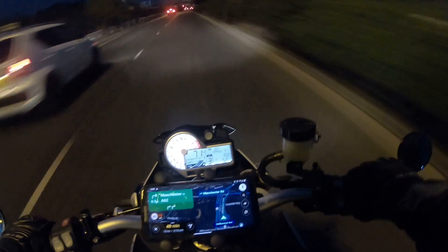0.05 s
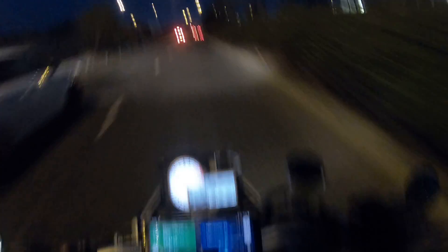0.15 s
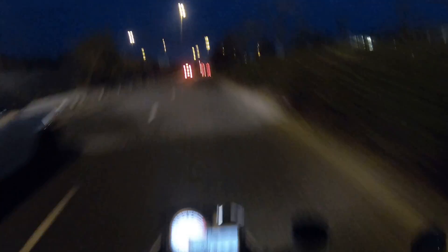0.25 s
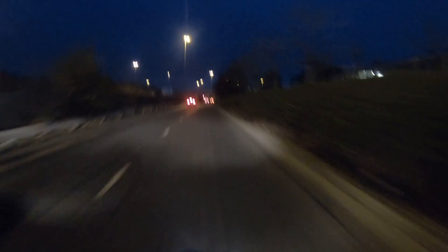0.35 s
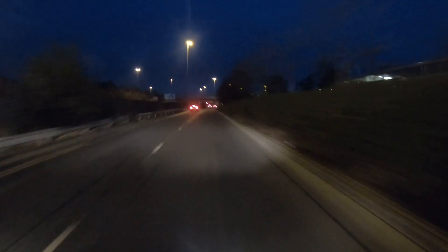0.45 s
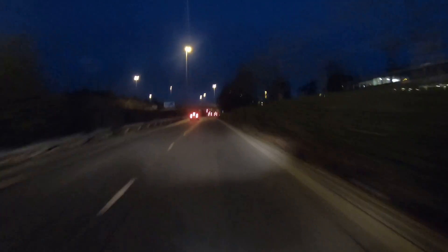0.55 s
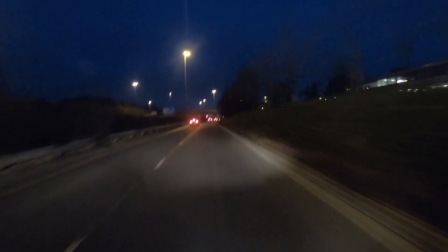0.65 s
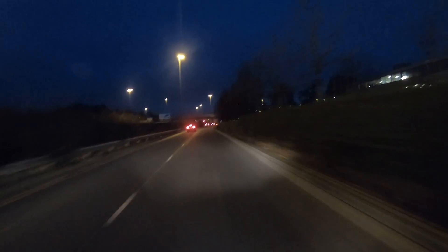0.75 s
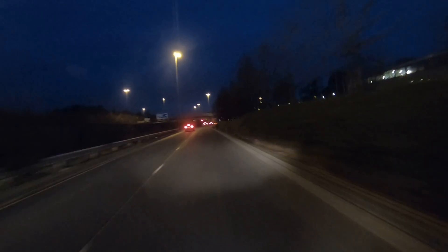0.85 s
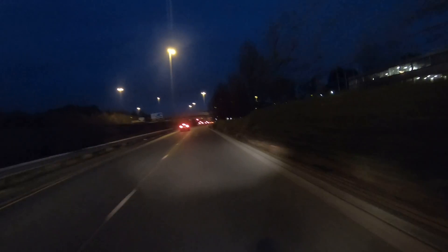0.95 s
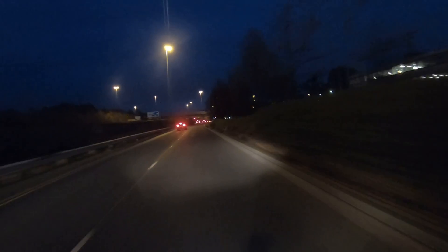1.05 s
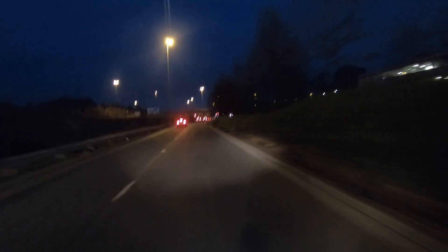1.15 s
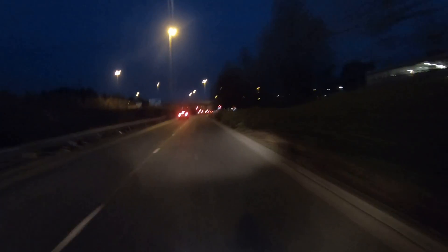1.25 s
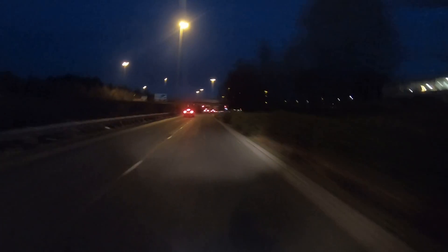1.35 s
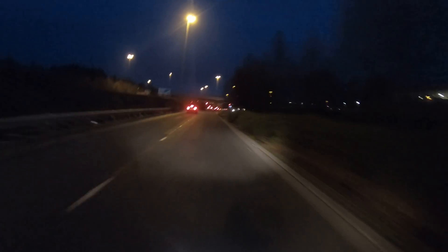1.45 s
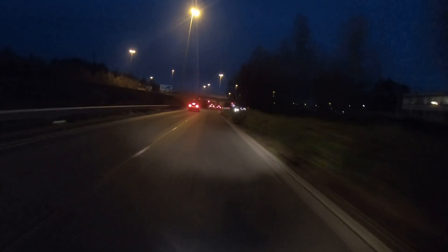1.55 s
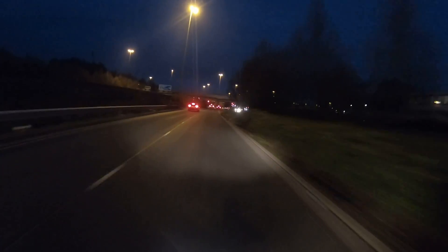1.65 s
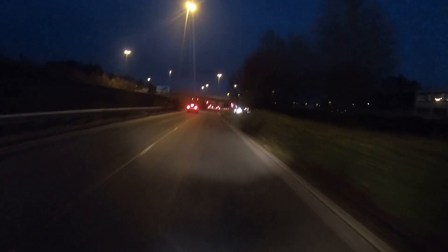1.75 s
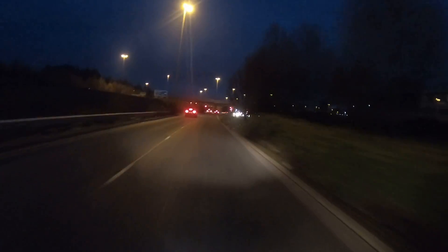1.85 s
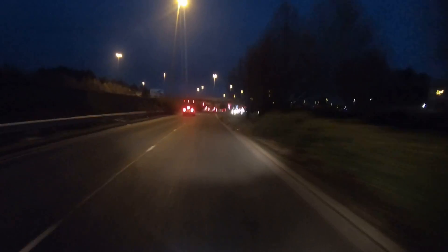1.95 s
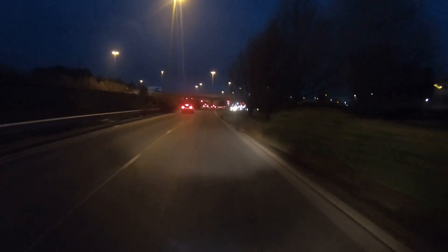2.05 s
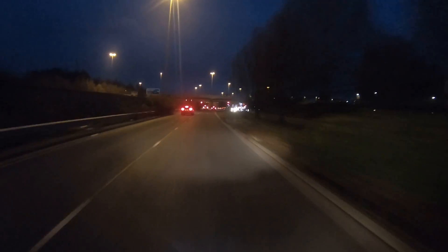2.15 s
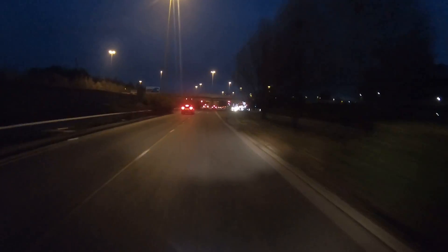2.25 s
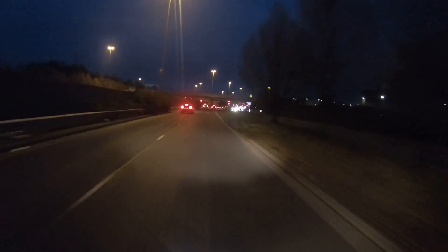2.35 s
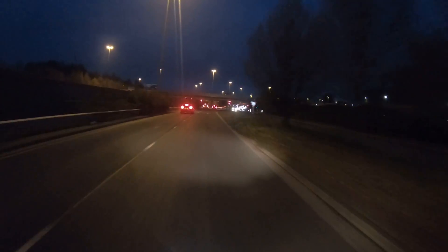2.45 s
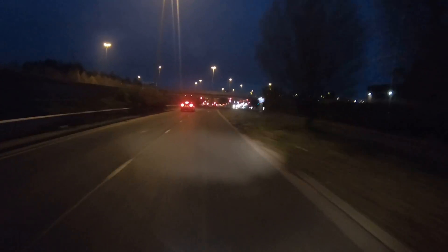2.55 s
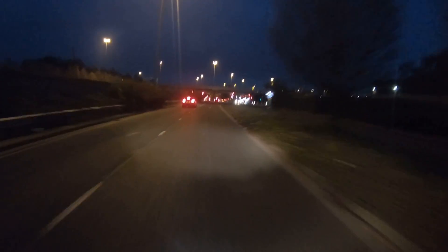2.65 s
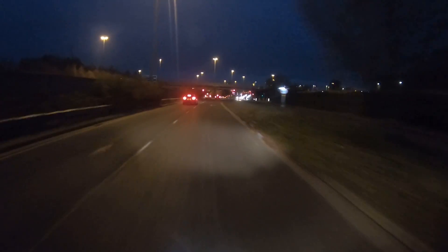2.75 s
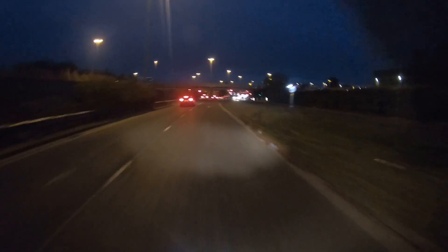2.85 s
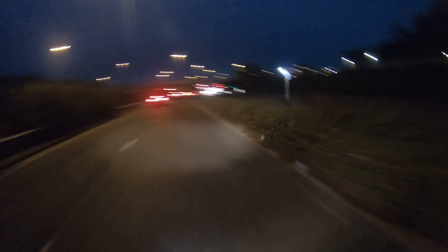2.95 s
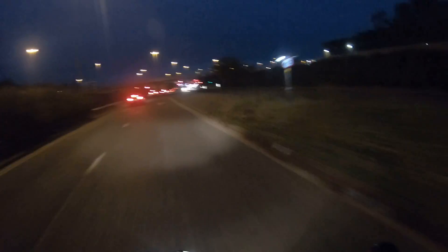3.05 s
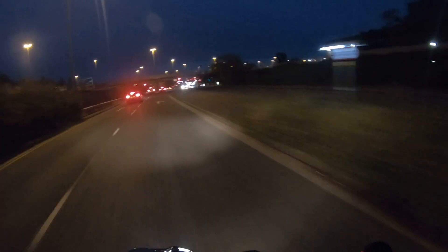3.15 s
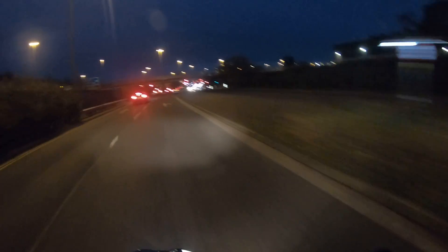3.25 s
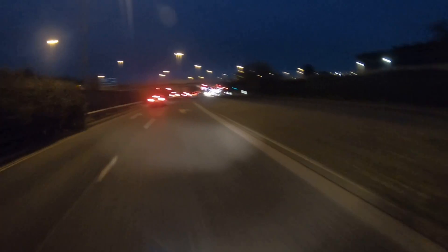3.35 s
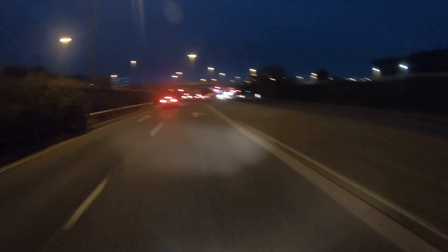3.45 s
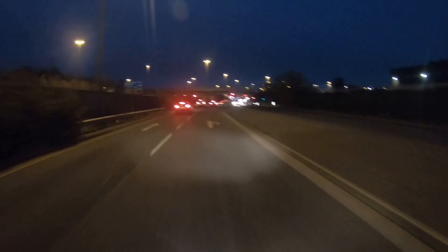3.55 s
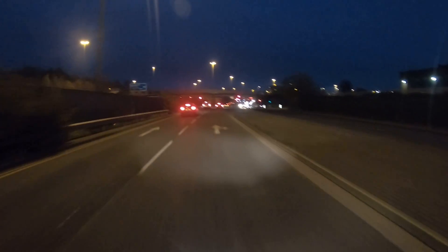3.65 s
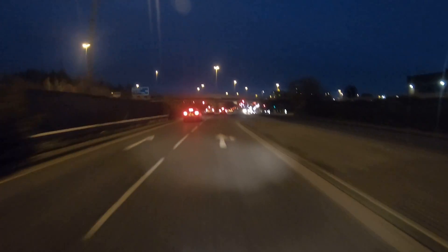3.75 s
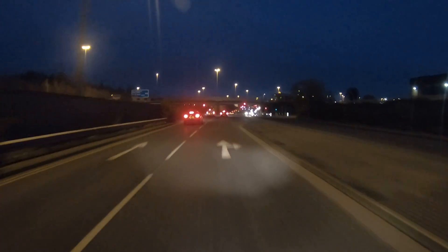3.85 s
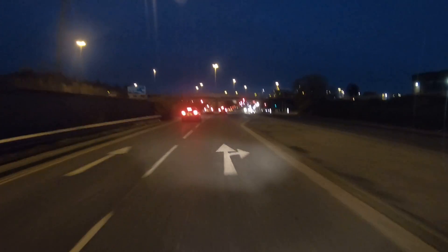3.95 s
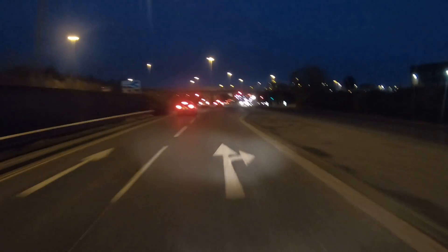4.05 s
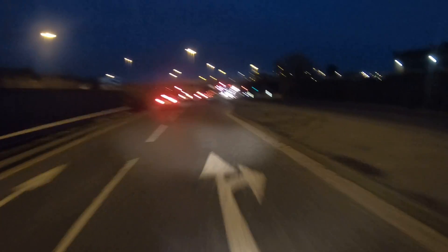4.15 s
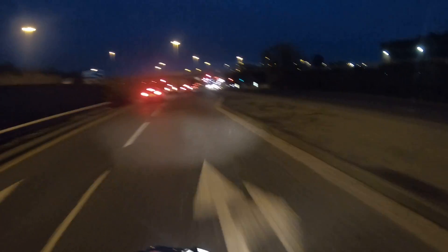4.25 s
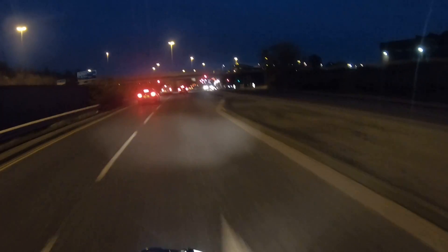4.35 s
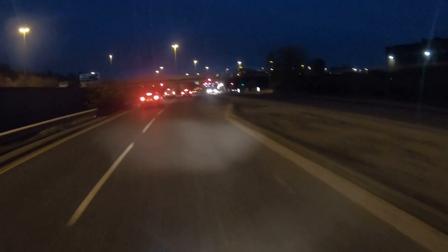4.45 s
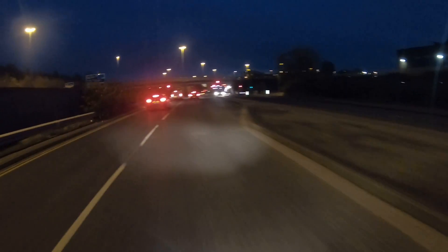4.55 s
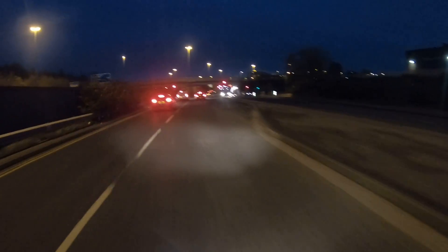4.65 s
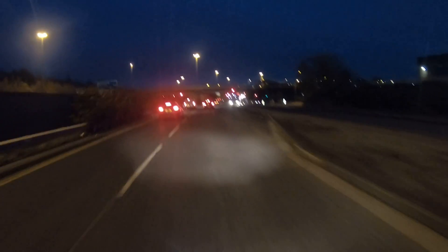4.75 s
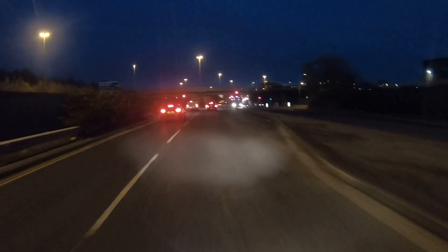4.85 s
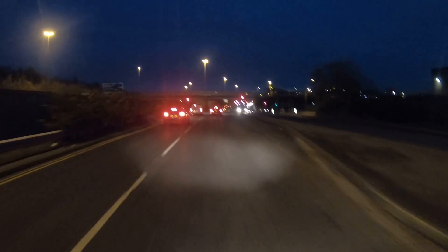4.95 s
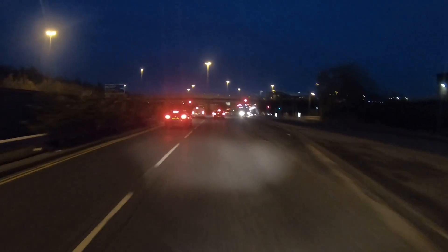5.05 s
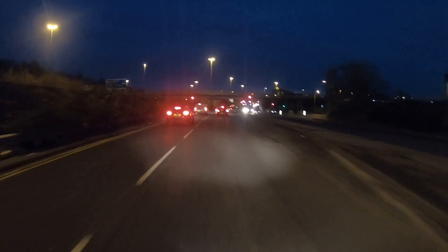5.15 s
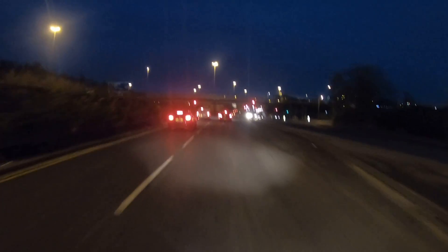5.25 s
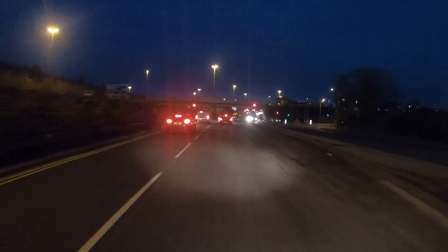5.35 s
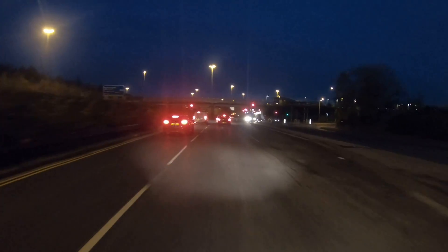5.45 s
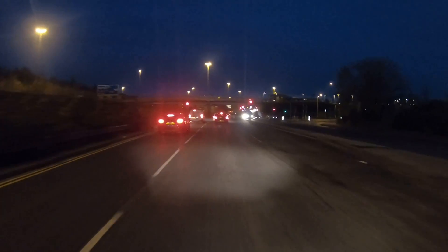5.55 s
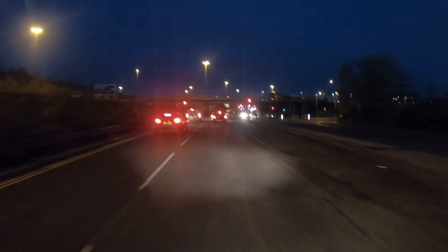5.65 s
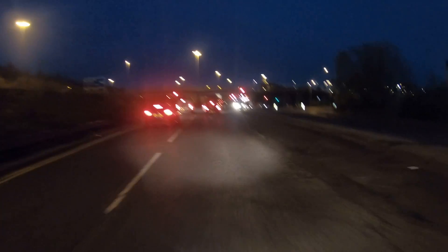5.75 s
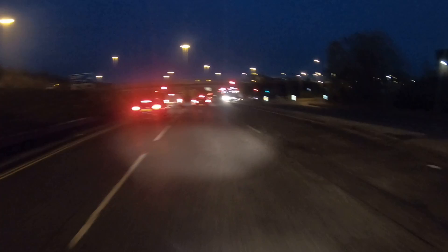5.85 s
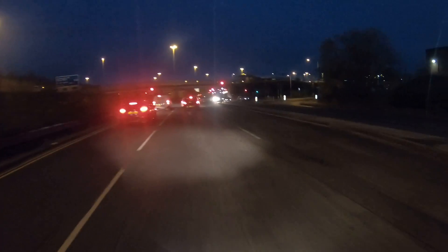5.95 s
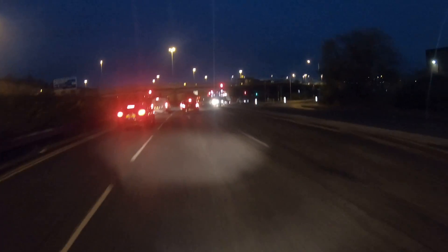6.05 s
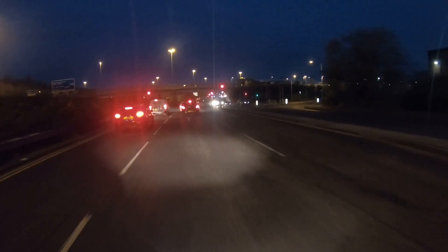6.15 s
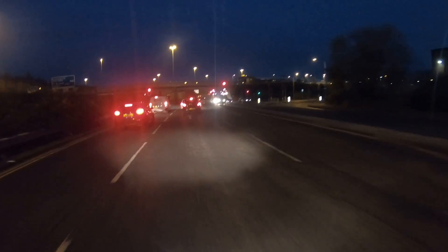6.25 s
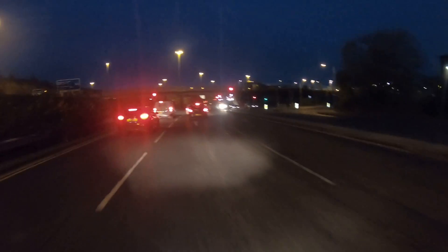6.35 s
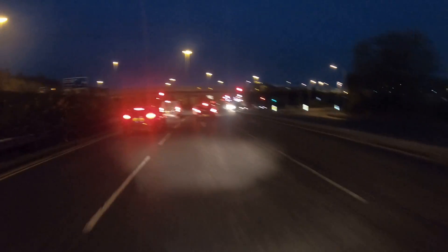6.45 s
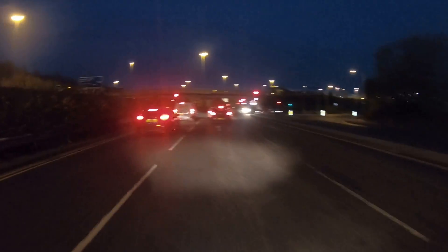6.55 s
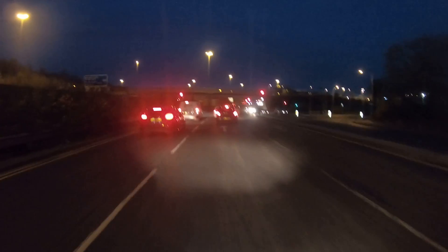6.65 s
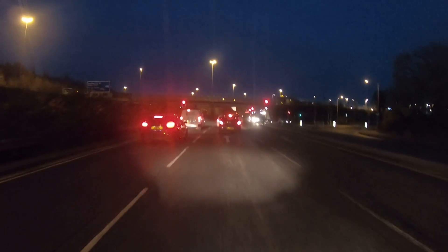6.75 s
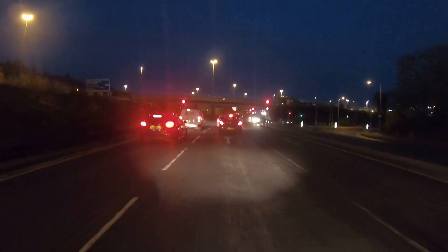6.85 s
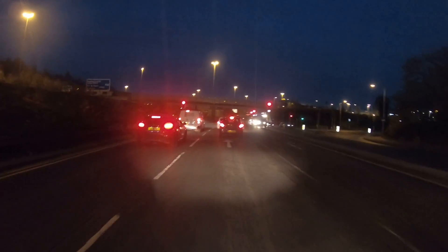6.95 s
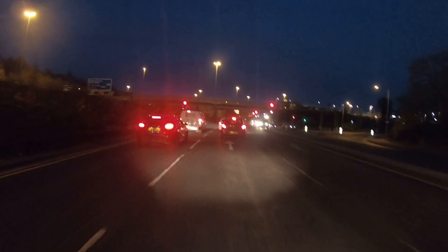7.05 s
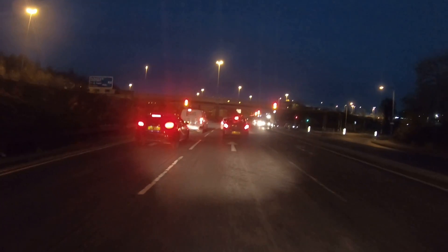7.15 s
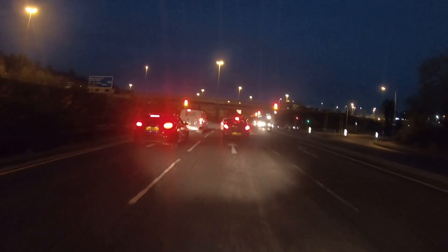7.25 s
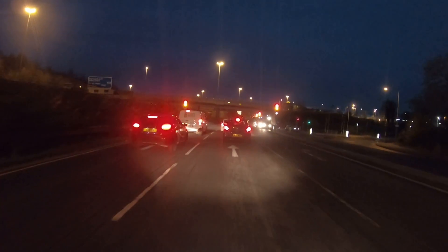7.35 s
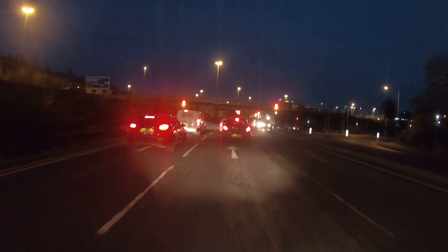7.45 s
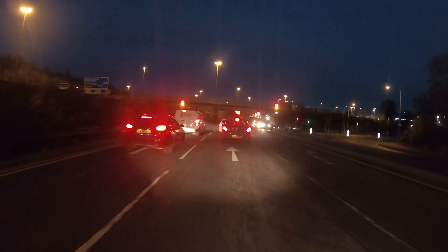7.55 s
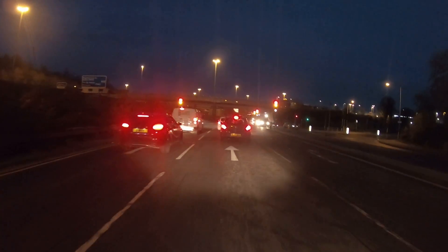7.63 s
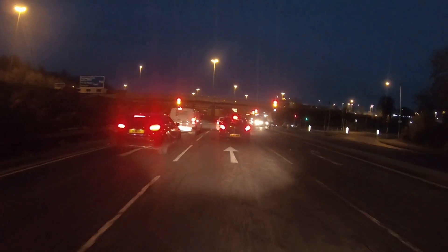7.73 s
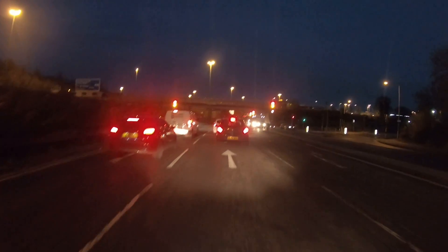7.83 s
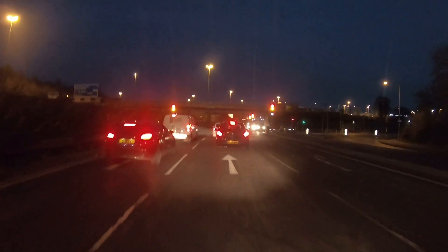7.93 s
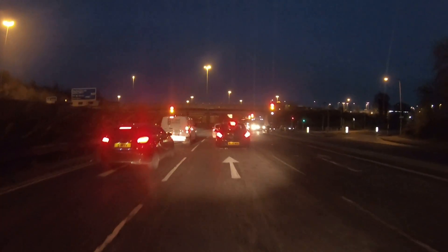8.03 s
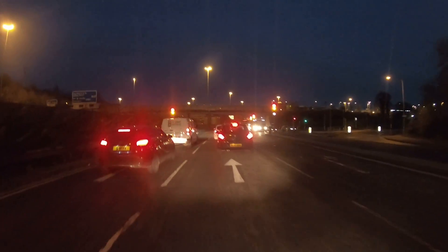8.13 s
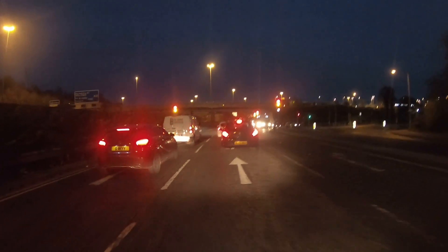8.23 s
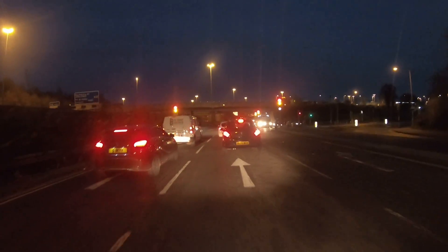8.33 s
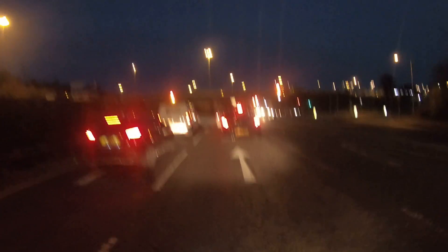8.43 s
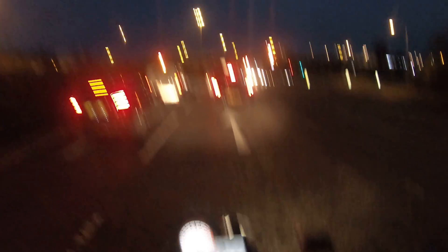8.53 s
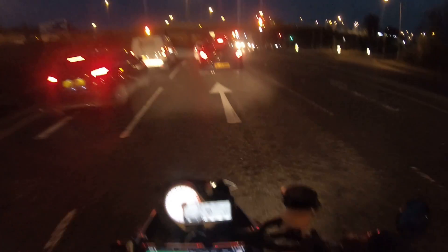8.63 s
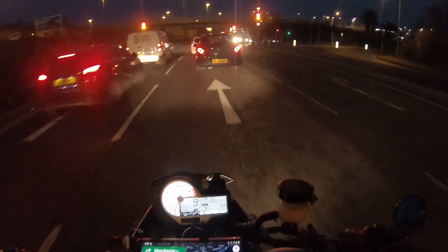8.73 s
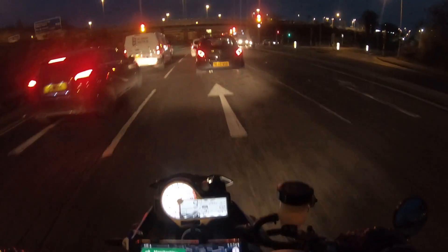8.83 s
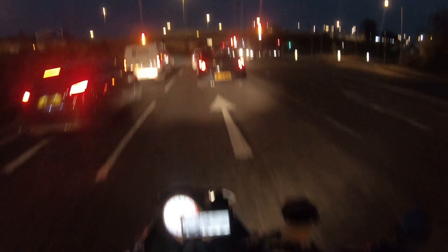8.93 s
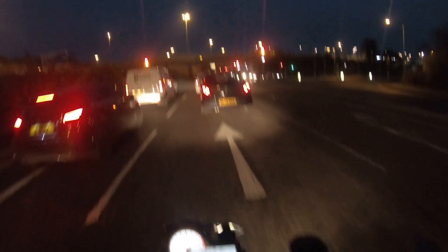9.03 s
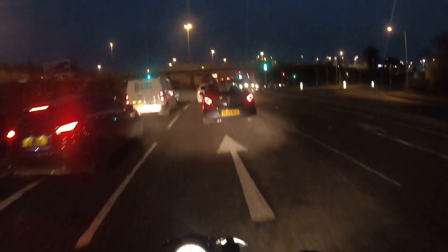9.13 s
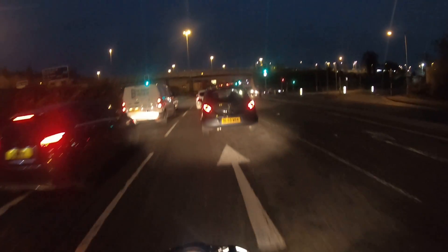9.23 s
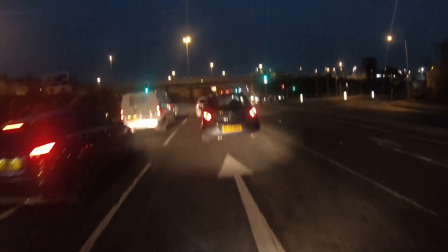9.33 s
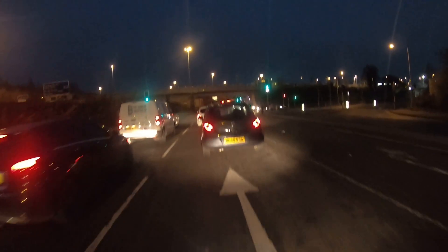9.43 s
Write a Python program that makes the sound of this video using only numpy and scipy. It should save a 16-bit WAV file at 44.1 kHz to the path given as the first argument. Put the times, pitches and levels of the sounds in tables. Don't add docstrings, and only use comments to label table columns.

```python
import sys
import numpy as np
from scipy import signal
from scipy.fft import rfft, irfft, next_fast_len
from scipy.io import wavfile
from scipy.ndimage import uniform_filter1d, map_coordinates

SR = 44100
rng = np.random.default_rng(int(sys.argv[2]) if len(sys.argv) > 2 else 0)


def amplitude_ratio(level_db):
    exponent = np.asarray(level_db, float) / 20
    return 10 ** exponent


def pcm_store(signal):
    levels = np.round(np.clip(np.atleast_2d(signal), -1, 1) * 32767)
    wavfile.write(sys.argv[1], SR, levels.astype(np.int16).T)


N = 418503
T_S = np.arange(N) / SR
CLUTCH_S = 6.23


def unit(x):
    return x / np.sqrt(np.mean(x ** 2) + 1e-20)


def curves(rows):
    s, *cols = np.transpose(rows)
    return [np.interp(T_S, s, c) for c in cols]


def wobble(rate_hz):
    knots = rng.standard_normal(int(N * rate_hz / SR) + 4)
    return map_coordinates(knots, [np.arange(N) * rate_hz / SR])


def filtered(x, response):
    m = next_fast_len(N + SR // 2)
    return irfft(rfft(x, m) * response(np.fft.rfftfreq(m, 1 / SR)), m)[:N]


def coloured(x, spectrum):
    f, db = np.transpose(spectrum)
    log_f = np.log(f + 1)
    return unit(filtered(x, lambda hz: amplitude_ratio(np.interp(np.log(hz + 1), log_f, db, -120, -120))))


def resonant(x, modes):
    def response(f):
        return sum(amplitude_ratio(db) * c * w / (c * c - f * f + 1j * f * w) for c, w, db in modes)
    return unit(filtered(x, response))


def patchy(depth_db):
    z = signal.stft(rng.standard_normal(N), nperseg=512)[2]
    field = uniform_filter1d(uniform_filter1d(rng.standard_normal(z.shape), 4, 0), 10, 1)
    return signal.istft(z * amplitude_ratio(depth_db * unit(field)), nperseg=512)[1][:N]


def swells(rows, rise_db_s, fall_db_s):
    gain = 0
    for start, end, db in rows:
        early_s = np.clip(start - T_S, 0, None)
        late_s = np.clip(T_S - end, 0, None)
        gain = gain + amplitude_ratio(db - rise_db_s * early_s - fall_db_s * late_s)
    return gain


def strikes(turns):
    return np.flatnonzero(np.diff(np.floor(turns)) > 0)


# (time [s], firing rate [1/s], drone level [dB])
OVERRUN = [(0.0, 228.6, -12), (2.1, 188.6, -11), (2.94, 164.5, -12.5), (3.5, 149.2, -12),
           (4.62, 112.8, -12), (5.18, 97.3, -14), (5.74, 79.6, -18.7), (6.24, 60.6, -28)]
# (time [s], firing rate [1/s])
IDLE = [(6.3, 46.2), (7.09, 41.3), (7.5, 43.5), (8.03, 42.9), (8.16, 46.7), (8.47, 41.3), (8.6, 45.7),
        (8.97, 42.4), (9.2, 43.4), (9.4, 38.3)]
# (time [s], loss [dB])
MISFIRES = [(5.639, -8.5), (5.791, -19), (5.866, -13.5), (5.962, -8.5), (6.038, -12.5), (6.145, -7),
            (6.24, -11.5), (6.432, -9.5), (6.601, -1.5), (6.798, -7.5), (6.68, -5.5), (6.98, -6.5),
            (7.053, -13.5), (7.179, -9.5), (7.632, -7), (7.706, -18.5), (7.92, -5), (8.467, -7.5),
            (8.602, -1.5), (8.645, -24), (8.781, -1.5), (8.823, -5), (9.2, -1.5), (9.35, -6.5), (9.446, -2)]
# (time [s], part of a firing cycle reached [1])
IDLE_SYNC = (7.5, .73)


def firings():
    turns_per_db, stall_s, recover_s = .0025, .012, .09
    count = np.cumsum(curves([row[:2] for row in OVERRUN] + list(IDLE))[0]) / SR
    lag = 0
    for s, db in MISFIRES:
        after_s = np.clip(T_S - s, 0, None)
        lag = lag + turns_per_db * db * (1 - np.exp(-after_s / stall_s)) * np.exp(-after_s / recover_s)
    return count - count[int(IDLE_SYNC[0] * SR)] % 1 + IDLE_SYNC[1] + lag


def stumble():
    return sum(db * np.exp(-((T_S - s) / 0.0095) ** 2) for s, db in MISFIRES)


# (time [s], length [s], loss [dB])
TURNS = [
    (.33, 0.13, -1),
    (1.765, .15, -4),
    (2.465, 0.1, -2.5),
]
# (frequency [Hz], width [Hz], level [dB])
TAIL_PIPE = [(425.8, 11, -37), (362, 39.4, -25), (309.8, 22, -30), (198, 11, -38.5), (167, 28, -27),
             (142, 26, -27)]
OFF_PEAK_DB = [-52, -44.5, -53.5]


def drone(count):
    hz, first_db = curves(OVERRUN)
    since_s = T_S - CLUTCH_S
    turn_db = sum(db * np.exp(-((T_S - s) / length) ** 2) for s, length, db in TURNS)
    lift = np.sqrt(sum(amplitude_ratio(db) ** 2 / (1 + (2 * (2 * hz - c) / w) ** 2) ** 2 for c, w, db in TAIL_PIPE))
    sink_db = .05 * (hz - 100.5)
    upper = [amplitude_ratio(db - sink_db + 4 * wobble(7)) for db in OFF_PEAK_DB]
    gains = [amplitude_ratio(first_db + turn_db), upper[0] + lift * amplitude_ratio(0.4 * wobble(8.7))] + upper[1:]
    fade_db = np.interp(since_s, [-.5, -.1, 0, .02, .07, .14], [0, 2, 2, -10, -12, -40]) + stumble()
    overtone_db = np.interp(since_s, [-.6, -.4], [.8, 0])
    sway = 0.021 * wobble(30)
    total = 0
    for k, g in enumerate(gains, start=1):
        level = amplitude_ratio((k > 1) * overtone_db + fade_db + 0.26 * wobble(25))
        total = total + np.sqrt(2) * g * level * np.cos(2 * np.pi * k * (count + sway))
    return total


# (time [s], combustion level [dB])
BURN = [(5.2, -31), (5.6, -29), (6.2, -32), (6.31, -33.5), (6.75, -32), (6.95, -24.5), (7.5, -21.5),
        (9.49, -22.5)]
# (frequency [Hz], width [Hz], level [dB])
PIPE = [(130.6, 48.8, 6.5), (268, 16, -3), (317.7, 37, -2.5), (404, 57, -8.5)]
# (frequency [Hz], density [dB per Hz])
INTAKE = [(450, -30.5), (600, -1.5), (850, 5.5), (1000, 1), (1070, 8.5), (1140, -8.5), (1400, -15.5),
          (2000, -34.5)]


def combustion(count):
    at = strikes(count + .43 + .02 * wobble(40))
    settled = np.interp(T_S - CLUTCH_S, [0, .6], [0, 1])
    uneven_db = (3 - 1.9 * settled[at]) * rng.standard_normal(len(at))
    pairing_db = 1.5 * wobble(3)[at] * (-1) ** np.arange(len(at))
    loss_db = np.roll(stumble(), -int(.009 * SR))[at]
    kicks = np.zeros(N)
    kicks[at] = amplitude_ratio(uneven_db + pairing_db + loss_db)
    soft = signal.fftconvolve(kicks, np.hanning(int(0.0025 * SR)), "same")
    blowing = signal.lfilter([1], [1, -np.exp(-1 / (0.028 * SR))], soft)
    puffs = resonant(blowing * rng.standard_normal(N), PIPE[1:])
    upper = resonant(soft, PIPE[1:]) + amplitude_ratio(-7) * puffs
    chambers = resonant(resonant(soft, PIPE[:1]), PIPE[:1])
    boom = chambers + amplitude_ratio(-14) * resonant(soft, [(43.2, 52, 0)])
    gulp = coloured((blowing + .12) * rng.standard_normal(N), INTAKE)
    bark = np.roll(upper, int(.004 * SR))
    pulses = amplitude_ratio(-14 * (1 - settled)) * (amplitude_ratio(-12.5) * bark + amplitude_ratio(-22) * gulp) - boom
    running = np.sqrt(np.abs(uniform_filter1d(pulses ** 2, SR // 2)) + 1e-12)
    burn_db = curves([(5.05, -63.5)] + list(BURN))[0]
    return amplitude_ratio(burn_db + 3.5) * pulses / running


# (time [s], length [s], multiple of firing rate [1], level against clatter [dB])
WHIRRS = [
    (.1, 0.16, 6.25, -1.5),
    (.6, 0.22, 5, -7),
    (2.698, .33, 9, -5),
    (4.17, 0.068, 39, -19),
    (4.614, .08, 39, -17.5),
    (6.1, 0.11, 39.5, -10),
]


def whirrs(count):
    total = 0
    for s, length, k, db in WHIRRS:
        swell = amplitude_ratio(db + 4.1 * wobble(60)) * np.exp(-((T_S - s) / length) ** 4)
        total = total + swell * np.sin(2 * np.pi * k * count + 0.76 * wobble(45))
    return total


# (time [s], clatter level [dB])
MACHINE = [(0, -33), (.6, -34.5), (1.3, -32), (2.9, -32.5), (4.0, -37.5), (5.0, -40), (6.3, -41),
           (6.8, -38.5), (7.3, -37), (8.0, -38.5), (9.49, -39)]
# (multiple of firing rate [1], level [dB])
GEARS = [(8.5, -4), (9.25, -7), (13, -9), (25, 1.5), (26, 5), (39, -1.5)]
# (frequency [Hz], width [Hz], level [dB])
COVERS = [(1090, 65, 3.5), (1388, 89, 10.5), (1660, 59, -13), (1820, 160, -3), (2030, 32, -3),
          (2136, 12, 3), (2472, 32, -5), (2810, 39, -22), (3360, 48, -19.5), (3680, 61, -25.5),
          (4380, 65, -28.5), (4900, 52, -32), (6010, 180, -27.5)]
# (frequency [Hz], density [dB per Hz])
CASING = [(380, -41), (480, 4.5), (560, 0), (720, -2), (900, -3), (1200, 0.5), (1500, -5), (2100, -6),
          (2650, -13), (2800, -23.5), (3300, -39)]
# (frequency [Hz], density [dB per Hz])
HISS = [(2400, -13.5), (2800, -16.5), (3300, -7), (3800, -1.5), (4700, -7.5), (6200, -4), (6800, -16),
        (8500, -15.5), (9300, -24), (11200, -37.5), (12000, -59.5)]
# (start [s], end [s], level [dB])
BRAKING = [
    (3.5, 3.95, -78),
    (4.3, 4.4, -81),
    (4.65, 5.27, -73.5),
    (6.7, 9.49, -76),
]
# (frequency [Hz], density [dB per Hz])
DISC = [(11000, -44), (11500, -9), (12300, 4.5), (13200, -5), (14500, -7), (15700, -13)]


def machinery(count):
    clatter_db, = curves(MACHINE)
    road = amplitude_ratio(-48 + 0.64 * (clatter_db + 34.5) - 0.49 * T_S)
    pads = amplitude_ratio(-103) + swells(BRAKING, rise_db_s=22, fall_db_s=220)
    ticks = np.zeros(N)
    for angle, size in rng.random((14, 2)):
        at = strikes(count / 4 + angle)
        ticks[at] += (size + 0.43) * amplitude_ratio(1.1 * rng.standard_normal(len(at)))
    gate = 1 + 0.29 * np.cos(2 * np.pi * (count + 0.16))
    load = np.clip(np.gradient(count) * SR / 130, 0, 1) ** 2
    teeth = sum(amplitude_ratio(db + 4 * wobble(7)) * np.sin(2 * np.pi * k * count + .25 * wobble(20)) for k, db in GEARS)
    rattle = amplitude_ratio(3.5) * gate * patchy(2.0)
    drive = unit(ticks - ticks.mean()) + amplitude_ratio(-18) * load * teeth + rattle
    ringing = resonant(np.gradient(drive), COVERS)
    ringing = filtered(ringing, lambda hz: 1 / np.sqrt(1 + (hz / 6600) ** 16))
    cases = amplitude_ratio(clatter_db - 3.5) * (coloured(patchy(1.0), CASING) + amplitude_ratio(-1.53) * ringing + whirrs(count))
    hiss = amplitude_ratio(-3.0) * road * coloured(patchy(.8), HISS)
    brake = pads * amplitude_ratio(2.2 * wobble(9)) * coloured(gate * patchy(1.1), DISC)
    return cases + hiss + brake


# (time [s], roar level [dB])
WIND = [(0, -26.5), (2.0, -30), (2.9, -32), (3.5, -27), (4.3, -36.5), (4.85, -41.5), (5.8, -44),
        (6.45, -40), (7, -42.5)]
# (frequency [Hz], density [dB per Hz])
ROAR = [(40, -8.5), (90, -2), (200, 6), (320, -2), (420, -11.5), (520, -18), (800, -27), (1200, -52)]
# (frequency [Hz], density [dB per Hz])
BUFFET = [(15, -9.5), (30, -3), (80, -2), (160, -7), (300, -20.5)]
# (start [s], end [s], level [dB])
GUSTS = [
    (.03, .38, -18),
    (.59, .64, -26),
    (1.07, 1.5, -37),
    (1.58, 1.93, -32),
    (3.4, 3.65, -35.5),
    (3.85, 4.0, -33),
    (5.1, 5.15, -32),
    (5.55, 6.05, -29),
]
# (frequency [Hz], density [dB per Hz])
SLAM = [(12, -8.5), (24, 2.5), (55, 0.5), (110, -11.5), (250, -22.5)]
# (start [s], end [s], flutter level [dB])
VISOR = [
    (.62, .63, -42),
    (2.3, 2.76, -31.5),
]
# (frequency [Hz], density [dB per Hz])
FLUTTER = [(250, -29), (340, -12.5), (400, -4.5), (435, -11), (560, -30)]


def wind():
    roar_db, = curves(WIND)
    rolling = T_S < CLUTCH_S
    eddies = amplitude_ratio(-35.5 - 1.3 * ~rolling + 3.5 * rolling * wobble(14))
    slams = swells(GUSTS, rise_db_s=260, fall_db_s=170) * coloured(rng.standard_normal(N), SLAM)
    thump = unit(amplitude_ratio(0.3 * wobble(6.8)) * coloured(rng.standard_normal(N), BUFFET))
    roar = amplitude_ratio(2 * wobble(10)) * coloured(patchy(0.82), ROAR)
    visor = amplitude_ratio(-54) + swells(VISOR, rise_db_s=10, fall_db_s=160)
    flutter = coloured(patchy(0.37), FLUTTER) * visor
    return amplitude_ratio(4.5) * eddies * thump + amplitude_ratio(2) * slams + amplitude_ratio(roar_db) * roar + flutter


def scene():
    count = firings()
    return (drone(count) + combustion(count) + machinery(count) + wind())[None]


def low_pass(x):
    return signal.sosfilt(signal.butter(12, 15720, fs=SR, output="sos"), x)


def record(dry):
    heard = filtered(dry[0], lambda hz: (1j * hz / (18 + 1j * hz)) ** 2)[None]
    return low_pass(heard)


dry = scene()
out = record(dry)
pcm_store(out)
```